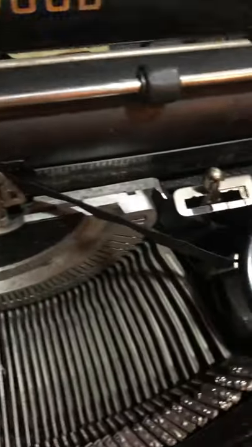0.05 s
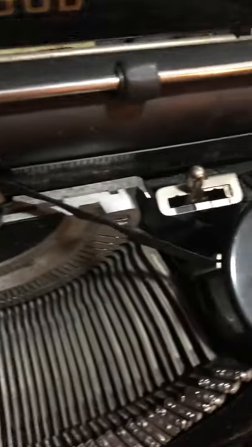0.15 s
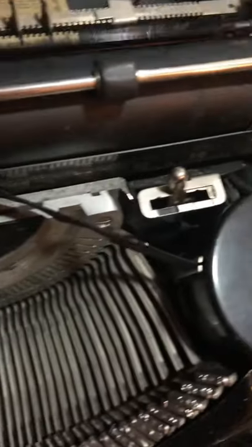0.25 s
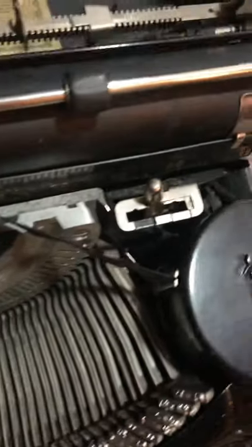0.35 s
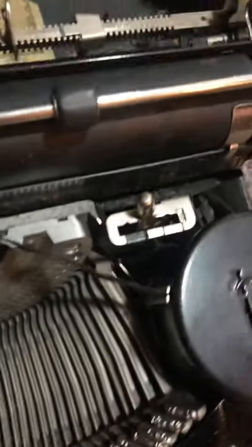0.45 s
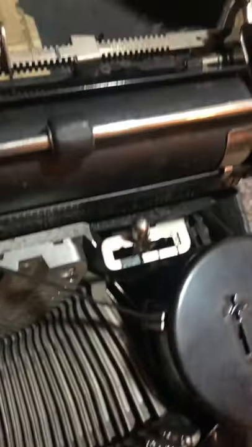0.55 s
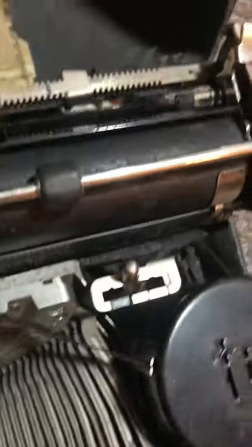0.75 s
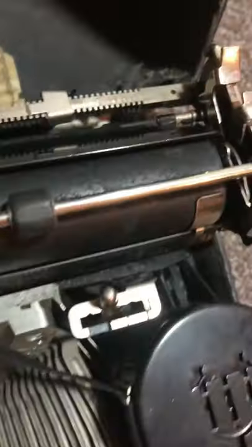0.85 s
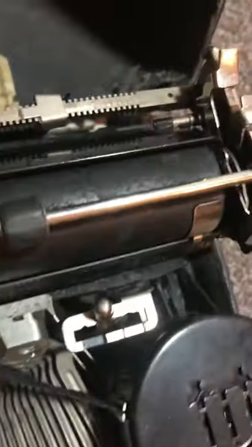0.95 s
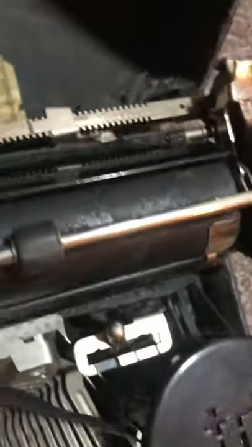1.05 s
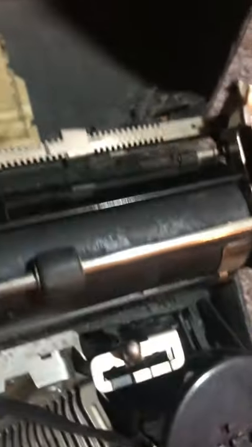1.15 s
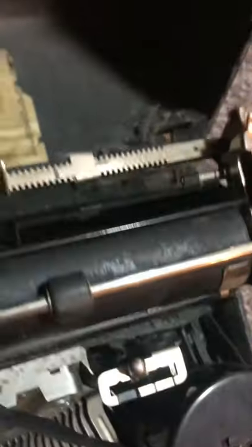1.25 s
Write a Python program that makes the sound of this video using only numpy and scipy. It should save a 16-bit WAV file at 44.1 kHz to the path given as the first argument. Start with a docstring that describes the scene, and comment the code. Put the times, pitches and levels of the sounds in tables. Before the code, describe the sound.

An old typewriter carriage scrapes faintly along its rail and hits its stop at about 0.2 seconds with one sharp metallic clack. Loose parts chatter, steel rings briefly and the case resonates, with a short bouncing rattle near 0.3 seconds and a slight echo. Two soft handling bumps come around 0.7 and 0.9 seconds. A low hum and faint noise fill the small quiet room throughout.

```python
"""A low hum fills a small quiet room while the carriage of an old typewriter scrapes faintly along its rail.
At about 0.2 s it hits its stop with one sharp metallic clack: loose linked parts chatter, steel parts
ring and the case booms. It bounces back in a short rattle that shakes a loose lever, and the room
echoes briefly. Near 0.7 s and 0.9 s come two soft bumps as the machine is handled."""
import sys
import numpy as np
from scipy import signal
from scipy.fft import rfft, irfft
from scipy.io import wavfile

SR = 44100
rng = np.random.default_rng(int(sys.argv[2]) if len(sys.argv) > 2 else 0)


def transcribe(signal):
    """Save signal, clipped to [-1, 1], as a 16-bit WAV file at the path in sys.argv[1]."""
    frames = np.atleast_2d(signal).T
    limited = np.clip(frames, -1, 1)
    pcm = np.round(limited * 32767).astype(np.int16)
    wavfile.write(sys.argv[1], SR, pcm)


N = 57330
T = np.arange(N) / SR
FREQS = np.maximum(np.arange(N // 2 + 1) * SR / N, 1)

# The tones of the hum: pitch_hz, starting_level_db, fade_db_per_s
HUM_TONES = [(59, -58.5, 10), (223, -65, 4.5)]
# The colour of the room's noise (how strong each pitch is): pitch_hz, level_db
AIR_COLOUR = [(25, -32.5), (45, -16), (62, -5), (85, -12), (115, -4.5), (150, -5.5), (215, 1.5), (300, -17),
              (355, -10), (430, -19), (800, -23.5), (1400, -28), (2600, -29), (3200, -33), (6400, -34.5),
              (16000, -43)]
# The colour of the carriage's scrape: pitch_hz, level_db
SLIDE_COLOUR = [(2000, -13), (4500, -9), (5900, 1), (7200, -5), (9500, -1.5), (12300, -11), (15700, -2)]
# Pitches that the rubbing brings out: pitch_hz, width_hz, boost_db
RUB_PEAKS = [(5458, 120, 5), (6030, 200, 9), (6500, 120, 6.8), (8100, 130, 8), (8950, 150, 10),
             (9670, 170, 9)]
# Parts knocking together: start_s, level_db, treble_db_per_octave, fade_s (time to fall by 60 dB)
KNOCKS = [(0.1915, -54, -0.5, 0.22), (0.2128, -12, -2, 0.059), (0.218, -17.5, 1.5, 0.065),
          (.2226, -13.5, 6.5, 0.066), (0.234, -19, 1, 0.042), (0.2692, -26.5, -5, 0.037),
          (0.2691, -20.5, -1.5, 0.048), (0.281, -22.5, 1, .035), (0.3004, -29.5, -3.5, 0.025)]
# The colour of the loose parts' chatter: pitch_hz, level_db
CHATTER_COLOUR = [(100, -31.5), (200, -19.5), (300, -16), (450, -10.5), (800, -12), (1200, -14.5),
                  (1480, -20), (1850, -8.5), (2050, -4), (2800, -6.5), (4400, 3.5), (7000, -1), (10000, -1),
                  (11300, -2), (12700, -6.5), (13400, 2), (15700, -2.5)]
# The colour of the room's echo: pitch_hz, level_db
ECHO_COLOUR = [(100, 1), (500, 5.5), (1500, 5), (3500, -0.5), (6000, -7.5), (9000, -6.5), (16000, -8)]
# How long the echo lasts: pitch_hz, fade_s
ECHO_FADES = [(200, 0.77), (2000, 0.22), (6000, 0.39), (15000, .2)]
# The very short tones of the struck stop: pitch_hz, level_db, fade_s
STOP_TONES = [(2090, -24.5, .025), (2480, -21.5, 0.024), (3264, -13.5, .035), (3607, -7, 0.015),
              (3800, -14.5, .012)]
# The carriage's hit and its bounce: start_s, steel_level_db, case_level_db
HITS = [(0.2134, 2.5, 0), (0.2701, -16, -7.5)]
# The tones of the steel parts: pitch_hz, level_db, fade_s
STEEL_TONES = [(1330, -56, .65), (4309, -28, .085), (4400, -28, .09), (4807, -27, .1), (5244, -25, .09),
               (5476, -26, .22), (6033, -27, .08), (6122, -17.5, .115), (8957, -23, .1), (11174, -24, .07),
               (11387, -26, .075), (13603, -28, .08), (14747, -24, .055), (15000, -26, .06)]
# The low tones of the case: pitch_hz, level_db, fade_s
CASE_TONES = [(227.8, -45.5, 0.48), (283.2, -33.5, 0.22), (467.8, -50.5, .08), (580, -48, 0.053)]
# Soft low thumps: start_s, level_db, rise_s, fade_s
THUMPS = [(.236, -43.5, 0.0093, 0.17), (0.294, -41, 0.0029, 0.099), (0.692, -45.5, 0.0046, 0.082),
          (0.706, -47, .003, 0.077), (0.888, -45, 0.002, 0.037)]
# The colour of a thump: pitch_hz, level_db
THUMP_COLOUR = [(40, -19), (75, -4), (110, 1), (180, -4.5), (300, -19), (700, -46)]
# The tones of the loose lever: pitch_hz, level_db, fade_s
LEVER_TONES = [(4730, -49, 0.038), (6670, -30.5, 0.11), (7750, -28.5, 0.061), (7730, -29, 0.056),
               (13400, -26, 0.0637)]
# Light touches on the machine: start_s, level_db, rise_s, fade_s, upper_edge_hz, hiss_db
TOUCHES = [(0.689, -54, 0.017, 0.12, 2180, -17.5), (0.8865, -54.5, 0.00036, .03, 1390, -27)]

STOP_S = 0.2132  # when the carriage reaches its stop


def gain(db):
    """Turn decibels into a number to multiply by."""
    return 10 ** (np.asarray(db) / 20)


def curve(points):
    """Join a table's points to get a value at every pitch."""
    hz, value = np.array(points, float).T
    return np.interp(np.log(FREQS), np.log(hz), value)


def noise(colour_db):
    """Noise of the given colour, always at the same overall strength."""
    phases = np.exp(2j * np.pi * rng.random(len(FREQS)))
    sound = irfft(gain(colour_db) * phases, N)
    return sound / sound.std()


def wobble(rate_hz):
    """A slow random drift, typically between -1 and 1."""
    return noise(-20 * np.log10(1 + (FREQS / rate_hz) ** 4))


def strike(start_s, rise_s, fade_s):
    """The loudness of a hit over time: it rises quickly, then dies away."""
    age = np.maximum(T - start_s, 0)
    return (1 - np.exp(-age / rise_s)) * np.exp(-np.log(1000) * age / fade_s)


def ring(tones, start_s, rise_s):
    """A struck part sounds all its tones at once, and each fades at its own speed."""
    return sum(gain(db) * strike(start_s, rise_s, fade_s)
               * np.sin(2 * np.pi * (hz * (T - start_s) + rng.random())) for hz, db, fade_s in tones)


def background():
    """A wavering hum slowly fades over low room noise."""
    hum = sum(gain(db - fade * T) * np.sin(2 * np.pi * hz * T + 0.5 * wobble(rate_hz=5))
              for hz, db, fade in HUM_TONES)
    air = gain(-60.5 + 0.5 * wobble(rate_hz=5.6)) * noise(curve(AIR_COLOUR))
    return hum + air


def slide():
    """The carriage rubs unevenly along its rail until it meets the stop."""
    peaks_db = sum(db / (1 + (2 * (FREQS - hz) / width) ** 2) for hz, width, db in RUB_PEAKS)
    moving = np.where(T < 0.043, gain(-6), 1) * (T < STOP_S)  # softer at first
    level_db = -69 + 2 * wobble(rate_hz=30)
    return moving * gain(level_db) * noise(curve(SLIDE_COLOUR) + peaks_db)


def chatter(treble_from_hz=2400):
    """Each knock shakes the loose linked parts: a burst of noise with its own brightness."""
    octaves = np.log2(np.maximum(FREQS / treble_from_hz, 1))
    colour_db = curve(CHATTER_COLOUR)
    return sum(gain(db) * strike(start_s, 0.00056, fade_s) * noise(colour_db + treble * octaves)
               for start_s, db, treble, fade_s in KNOCKS)


def room_echo(sound, bands=8):
    """The small room smears a sound into a soft echo whose low pitches last longest."""
    spectrum = rfft(noise(curve(ECHO_COLOUR)))
    fade_s = curve(ECHO_FADES)
    band = (np.sqrt(FREQS / (FREQS[-1] + 1)) * bands).astype(int)  # group nearby pitches
    tail = sum(irfft(spectrum * (band == k), N) * strike(0, 0.024, fade_s[band == k].mean())
               for k in range(bands))
    return gain(-19.5) * signal.fftconvolve(sound, tail / np.linalg.norm(tail))[:N]


def stop_clack():
    """The carriage cracks once against its stop, which hardly rings."""
    return gain(0.5) * ring(STOP_TONES, STOP_S, rise_s=0.00046)


def steel_and_case():
    """The hit and the bounce each make the steel parts ring and the case boom."""
    return sum(gain(steel_db) * ring(STEEL_TONES, start_s, rise_s=0.002)
               + gain(case_db) * ring(CASE_TONES, start_s, rise_s=0.0047)
               for start_s, steel_db, case_db in HITS)


def thumps():
    """The machine thumps softly as it settles and is handled."""
    return sum(gain(db) * strike(start_s, rise_s, fade_s) * noise(curve(THUMP_COLOUR))
               for start_s, db, rise_s, fade_s in THUMPS)


def loose_lever():
    """The bounce shakes a loose lever, which rings high and briefly."""
    return ring(LEVER_TONES, start_s=0.2695, rise_s=0.0015)


def touches():
    """Light handling makes dull puffs of noise with a trace of hiss on top."""
    sound = np.zeros(N)
    for start_s, db, rise_s, fade_s, edge_hz, hiss_db in TOUCHES:
        dull = 1 / (1 + (FREQS / edge_hz) ** 6)
        colour_db = 20 * np.log10(dull + gain(hiss_db))
        sound += gain(db) * strike(start_s, rise_s, fade_s) * noise(colour_db)
    return sound


def scene():
    """Add everything into one channel; only the scrape and the chatter get an echo."""
    clatter = slide() + chatter()
    mix = background() + clatter + room_echo(clatter) + stop_clack() + steel_and_case()
    return (mix + thumps() + loose_lever() + touches())[None]


def record(dry):
    """Take away the deepest bass and the very highest treble."""
    bass_cut = signal.butter(4, 42, "highpass", fs=SR, output="sos")  # below 42 Hz
    treble_cut = signal.ellip(10, 0.2, 80, 15750, fs=SR, output="sos")  # above 15750 Hz
    return signal.sosfilt(treble_cut, signal.sosfilt(bass_cut, dry))


dry = scene()
out = record(dry)
transcribe(out)
```